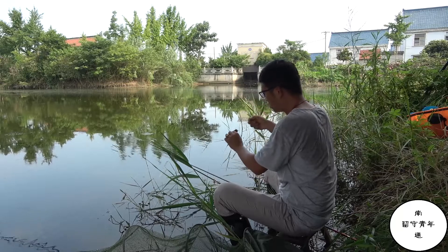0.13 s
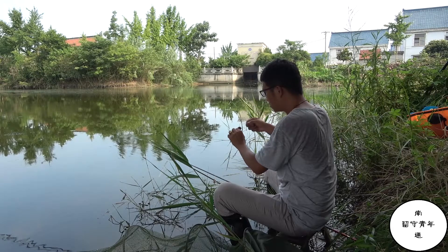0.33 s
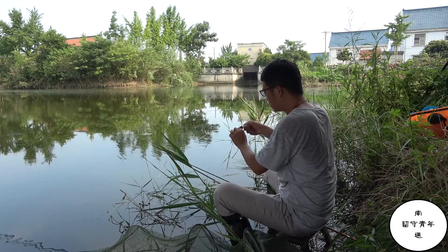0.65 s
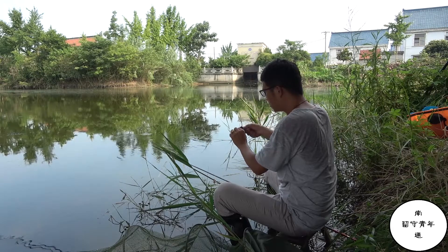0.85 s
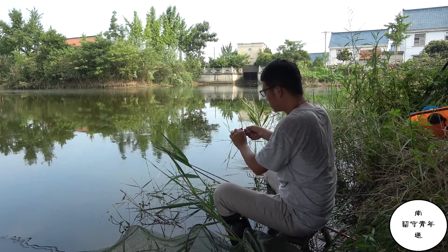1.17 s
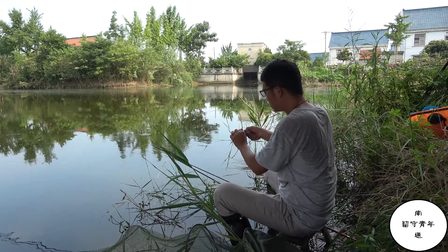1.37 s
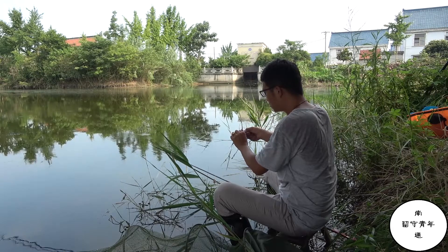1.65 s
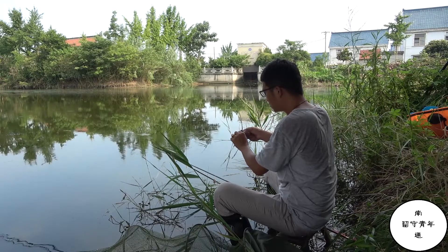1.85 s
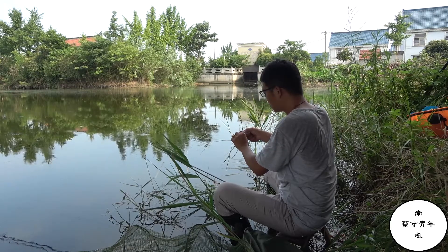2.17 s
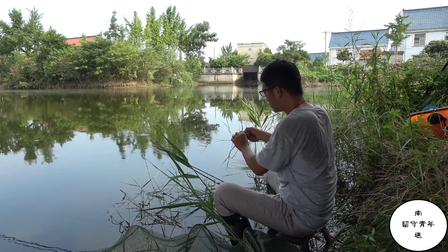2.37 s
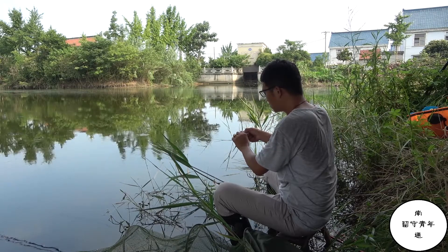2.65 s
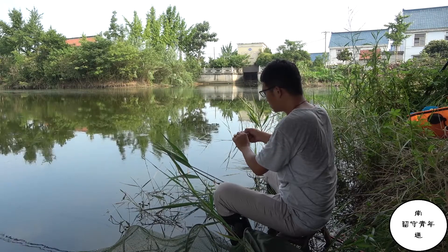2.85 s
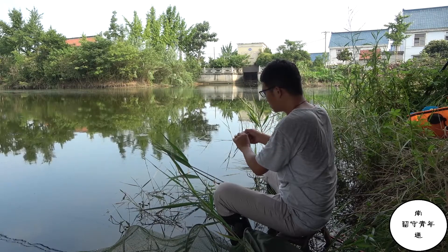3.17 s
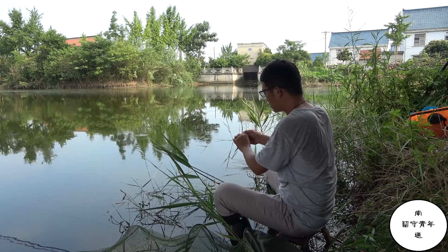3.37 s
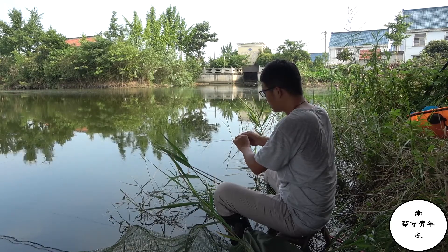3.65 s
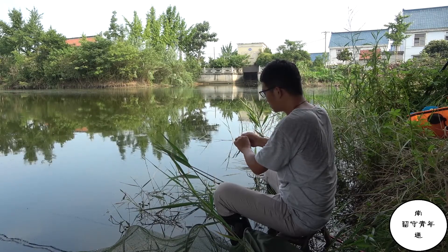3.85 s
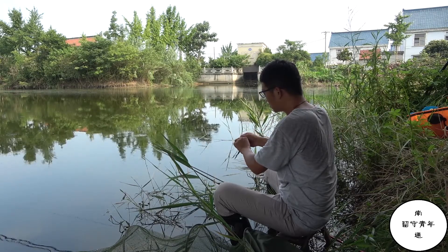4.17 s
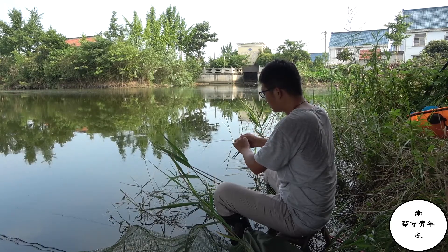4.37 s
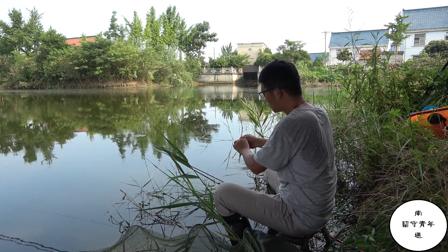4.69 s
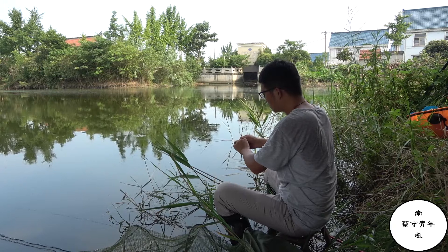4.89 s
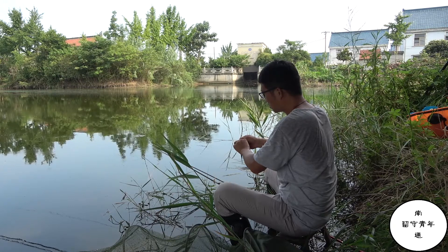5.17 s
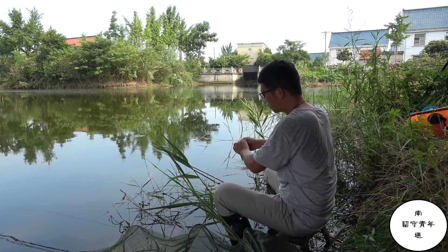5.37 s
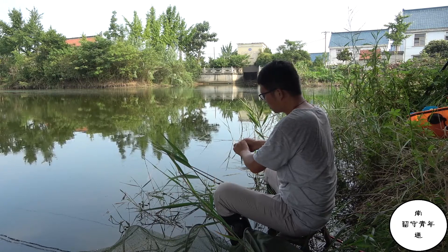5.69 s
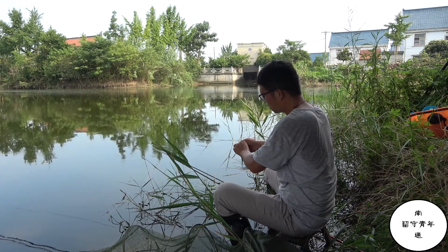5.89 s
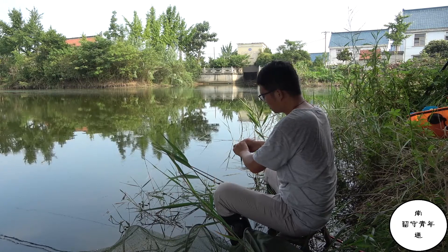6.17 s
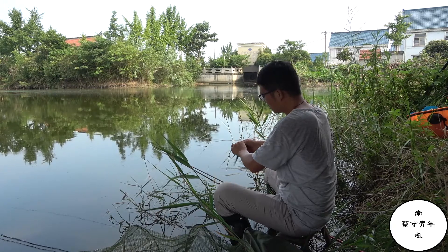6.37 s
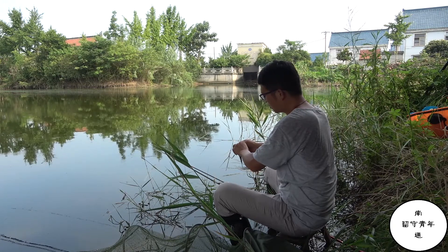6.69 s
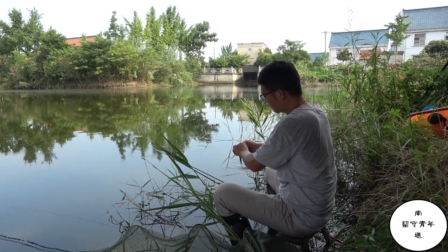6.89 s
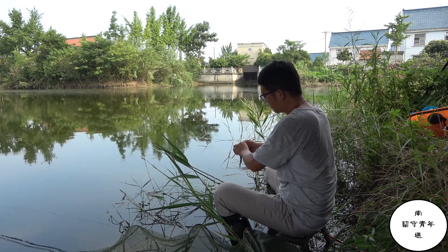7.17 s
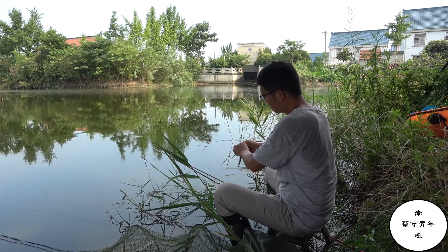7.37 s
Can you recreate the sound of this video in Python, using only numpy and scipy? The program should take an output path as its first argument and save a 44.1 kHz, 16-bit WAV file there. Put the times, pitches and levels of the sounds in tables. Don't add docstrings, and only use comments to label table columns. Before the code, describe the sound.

A dense, high, steady cicada chorus fills the air by a still pond, over faint distant machinery, with hoarse bird chips and a small water plop.

```python
import sys
import numpy as np
from scipy import signal
from scipy.fft import rfft, irfft, next_fast_len
from scipy.io import wavfile
from scipy.ndimage import uniform_filter1d

SR = 44100
rng = np.random.default_rng(int(sys.argv[2]) if len(sys.argv) > 2 else 0)


def waveform_to_disk(signal):
    frames = np.transpose(np.atleast_2d(signal))
    scaled = np.clip(frames, -1, 1) * 32767
    samples = np.round(scaled).astype(np.int16)
    wavfile.write(sys.argv[1], SR, samples)


def elevation(decibels):
    levels = np.asarray(decibels, float)
    return 10 ** (levels / 20)


N = 332469
SIZE = next_fast_len(N + 4096)
HZ = np.fft.rfftfreq(SIZE, 1 / SR)
TIME = np.arange(N) / SR


def evened(x):
    return x / np.sqrt(np.mean(x ** 2, -1, keepdims=True) + 1e-20)


def curves(rows):
    s, *columns = np.transpose(rows)
    return np.array([np.interp(TIME, s, c) for c in columns])


def wander(rate_hz):
    hz, phase = np.geomspace(.1, rate_hz, 16)[:, None], rng.random((16, 1))
    coarse = TIME[::64]
    waves = np.sin(2 * np.pi * (hz * coarse + phase)) / np.sqrt(hz)
    return np.interp(TIME, coarse, evened(waves.sum(0)))


def sides(pan_db):
    return elevation(np.array([pan_db / 2, -pan_db / 2]))


def resonate(x, hz, width):
    turn = np.exp(2j * np.pi * np.cumsum(hz * np.ones(len(x))) / SR)
    r = np.exp(-np.pi * width / SR)
    return 2 * (turn * signal.lfilter([(1 - r) ** 2], [1, -2 * r, r * r], x / turn)).real


def add(mix, s, sound):
    part = mix[:, round(s * SR):][:, :sound.shape[1]]
    part += sound[:, :part.shape[1]]


def cicadas(modes, effort, pan_db, rate_hz, jitter, shared, echo_s, throb_db, spread, count):
    grid = HZ[::64]
    power = sum(elevation(db) ** 2 / (1 + (2 * (grid - hz) / width) ** 2) ** 2 for hz, width, db in modes)
    body = np.sqrt(power)
    body /= np.sqrt(1 + (3150 / (grid + 1)) ** 24)
    t = np.arange(4096) / SR
    decay = np.exp(-np.log(1000) * t / echo_s) * (1 - np.exp(-t / 0.0098))
    chorus = 0
    for _ in range(count):
        uneven = jitter * evened(uniform_filter1d(rng.standard_normal(N), 60))
        pace = rate_hz * rng.uniform(.9, 1.1) * (1 + .02 * wander(3) + uneven)
        clicks = np.diff(np.floor(np.cumsum(pace) / SR), prepend=0)
        clicks *= elevation(3.3 * rng.standard_normal(N) + throb_db * wander(14))
        both, *each = rng.standard_normal((3, len(t))) * decay
        leaves = rfft(shared * both + np.array(each), SIZE)
        tuned = np.interp(HZ * (1 + spread * rng.uniform(-0.9, 1)), grid, body)
        chorus = chorus + rfft(clicks, SIZE) * tuned * leaves
    song = irfft(chorus, SIZE)
    song = song[:, :N] + np.pad(song[:, N:], ((0, 0), (0, 2 * N - SIZE)))
    drift_db = np.linspace(*pan_db, N)
    return elevation(curves(effort)) * sides(drift_db) * evened(song)


# (frequency [Hz], width [Hz], level [dB])
HIGH_MODES = [(7103, 520, -4), (7610, 590, 1), (8160, 740, 0.5), (8750, 610, -4), (9290, 880, -10.5),
              (9860, 1870, -21), (11500, 4400, -30.5)]
# (time [s], level [dB])
HIGH_EFFORT = [(0, -32.5), (7.6, -32.5)]


def high_chorus():
    return cicadas(HIGH_MODES, HIGH_EFFORT, (4.8, 4.7), rate_hz=460, jitter=.12, shared=0.08,
                   echo_s=.1, throb_db=.5, spread=.007, count=7)


# (frequency [Hz], width [Hz], level [dB])
MIDDLE_MODES = [(5546, 430, -3.5), (5986, 440, 1), (6430, 760, -1)]
# (time [s], level [dB])
MIDDLE_EFFORT = [(0, -43), (4, -41.5), (7.6, -43.5)]


def middle_chorus():
    return cicadas(MIDDLE_MODES, MIDDLE_EFFORT, (2.5, 4.5), rate_hz=400, jitter=.2, shared=0.89,
                   echo_s=0.093, throb_db=2.5, spread=0.0091, count=4)


# (frequency [Hz], width [Hz], level [dB])
SWELLING_MODES = [(3400, 75, -1.5), (4030, 2300, -0.5), (4680, 440, 3.5), (5570, 1300, 0),
                  (6440, 1800, -4.5), (10340, 1060, -12)]
# (time [s], level [dB])
SWELLING_EFFORT = [(0, -50), (1.6, -56), (2.2, -48), (4, -44.5), (4.8, -42), (5.8, -42.5), (7.6, -44.5)]


def swelling_chorus():
    return cicadas(SWELLING_MODES, SWELLING_EFFORT, (12, 22), rate_hz=350, jitter=.25, shared=1.37,
                   echo_s=0.12, throb_db=-1.0, spread=0.015, count=5)


# (frequency [Hz], width [Hz], level [dB])
FADING_MODES = [(3550, 400, -2.5), (4370, 200, 1), (4720, 930, -2.5)]
# (time [s], level [dB])
FADING_EFFORT = [(0, -45.5), (2, -46.5), (5, -54), (7.6, -63)]


def fading_chorus():
    return cicadas(FADING_MODES, FADING_EFFORT, (1.5, 14), rate_hz=300, jitter=.25, shared=2.7,
                   echo_s=0.049, throb_db=0.95, spread=0.017, count=4)


# (frequency [Hz], density [dB per Hz])
AIR = [(12, -37), (20, -5), (64, 4), (167, 1), (300, -3), (550, -10), (900, -7.5), (1230, -15), (1800, -19),
       (2300, -15.5), (2900, -21), (3800, -23.5)]
# (frequency [Hz], correlation [share])
AIR_SAME = [(40, .9995), (90, .998), (160, .985), (300, .88), (500, .83), (1200, .88), (2500, .88)]


def air():
    air_db, hiss_db = -53, -72
    a, b = rfft(rng.standard_normal((2, SIZE)))
    same = np.clip(np.interp(HZ, *np.transpose(AIR_SAME)), -1, 1)
    hz, db = np.transpose(AIR)
    colour = elevation(np.interp(np.log(HZ + 1), np.log(hz), db))
    pair = np.array([a, same * a + np.sqrt(1 - same ** 2) * b]) * colour
    rumble = evened(irfft(pair, SIZE)[:, :N])
    hiss = signal.lfilter([1], [1, -.5], rng.standard_normal((2, N)))
    return elevation(air_db + 0.38 * wander(9.4)) * rumble + elevation(hiss_db) * hiss


def drone():
    near, far = (evened(resonate(rng.standard_normal(N), 783, 292)) for _ in range(2))
    throb = evened(uniform_filter1d(uniform_filter1d(rng.standard_normal(N), 900), 900))
    pair = near + .3 * far * np.array([[1], [-1]])
    return elevation(-57.5 + 1.3 * throb) * sides(3.5)[:, None] * pair


def whine():
    start_hz, sag_hz, pass_s, sag_s = 837, 81.4, 1.01, 0.27
    near_db, far_db, near_s, stay_s = -52, -12.5, 0.99, 0.65
    hz = start_hz - sag_hz * (.5 + .5 * np.tanh((TIME - pass_s) / sag_s)) + 14 * wander(5)
    level_db = near_db + far_db * (1 - np.exp(-.5 * ((TIME - near_s) / stay_s) ** 2))
    strands = 0
    for ratio, db in ((1, -4), (0.845, -6.0)):
        strand = evened(resonate(rng.standard_normal(N), ratio * hz, 31.6))
        strands = strands + elevation(level_db + db + 3.7 * wander(10)) * strand
    return strands


# (peak time [s], half length [s], level [dB], centre [Hz])
SWELLS = [
    (.5, 0.97, -58.5, 162),
    (2.2, 0.24, -58, 265),
    (3.3, 0.52, -55, 243),
    (5.2, 0.56, -53, 186),
    (6.9, 0.75, -58.5, 175),
    (4.95, 0.28, -61, 430),
]


def swells():
    total = np.zeros((2, N))
    for s, half, db, centre_hz in SWELLS:
        low, side = (evened(resonate(noise, centre_hz, 127)) for noise in rng.standard_normal((2, N)))
        bell = np.exp(-.5 * ((TIME - s) / half) ** 2)
        total += elevation(db) * bell * (low + 0.027 * side * np.array([[1], [-1]]))
    return total


# (frequency [Hz], rms level [dB])
HUM = [(300, -66.5), (410, -72), (1350, -79)]


def hum():
    total = 0
    for hz, db in HUM:
        tone = np.sin(2 * np.pi * hz * TIME + 1.47 * wander(6))
        total = total + np.sqrt(2) * elevation(db + 0.52 * wander(4.7)) * tone
    return total


# (time [s], length [s], level [dB], centre [Hz], width [Hz])
RUSTLES = [(0.82, 0.083, -57.5, 2100, 1100), (0.863, 0.11, -56, 1890, 600), (0.926, 0.12, -59, 2000, 1200),
           (1.019, 0.086, -58, 2200, 1500), (2.263, 0.076, -55.5, 1390, 1900),
           (4.018, 0.27, -60.5, 2660, 800), (4.155, 0.082, -60, 1380, 500), (4.517, 0.083, -56, 2420, 1500),
           (5.66, 0.14, -61.5, 1510, 1200), (5.998, .1, -65, 1700, 900), (6.705, 0.066, -63, 1900, 1300),
           (6.913, 0.14, -59.5, 1980, 1800), (7.395, 0.15, -57, 2010, 1600)]


def reeds(mix):
    for s, length, db, hz, width in RUSTLES:
        u = np.linspace(0, 1, round(np.clip(length * 1.04, .01, .5) * SR))
        clumps, noise = rng.standard_normal((2, 22050))
        clumps = elevation(2.5 * evened(uniform_filter1d(clumps, 150)))
        scratch = evened(resonate((clumps * noise)[:len(u)], hz, width))
        stroke = np.sin(np.pi * u ** 0.54) ** 0.88
        add(mix, s, elevation(db + 1.5) * scratch * stroke * np.ones((2, 1)))


# (time [s], peak level [dB], pitch [Hz], fall of pitch [share])
CHIPS = [(2.908, -55, 1910, 0.11), (2.982, -47, 2340, 0.15), (3.05, -61, 2250, .03),
         (3.185, -55, 2300, .05), (3.237, -45, 2510, 0.019), (3.25, -50, 2680, 0.052),
         (3.592, -41.5, 2420, 0.15), (3.798, -51, 2370, 0.15), (3.999, -40, 2356, 0.078),
         (4.044, -54, 2380, .02), (4.199, -50, 2370, 0.09), (4.357, -46.5, 2450, 0.027),
         (4.37, -53, 2140, 0.13), (4.787, -39.5, 2280, 0.014), (4.967, -59, 2300, 0.046),
         (5.226, -45, 2300, 0.059), (5.232, -55, 2080, .04), (5.43, -59, 2290, .03),
         (5.663, -43.5, 2150, 0.024), (5.865, -58, 2200, .05), (6.127, -46, 2360, .14),
         (6.536, -49, 2350, 0.14), (6.73, -44.5, 2610, .01), (6.928, -54, 2320, 0.092),
         (7.08, -50, 2610, .05)]


def bird(mix):
    u = np.linspace(0, 1, round(.039 * SR))
    for s, db, hz, fall in CHIPS:
        flutter, rasp = evened(uniform_filter1d(rng.standard_normal((2, 8820)), 90))[:, :len(u)]
        turns = np.cumsum(hz * (1 + fall * (.25 - u ** 1.6) + .015 * flutter)) / SR
        voice = np.sin(2 * np.pi * turns) + elevation(-11.5) * np.sin(np.pi * turns)
        note = voice * (1 + 0.33 * rasp) * np.sin(np.pi * u ** 0.85)
        tail = rng.standard_normal((2, 4000)) * elevation(-32.5 - np.arange(4000) / SR * 410)
        tail[:, 0] = 1
        heard = signal.fftconvolve(note[None], tail, axes=1)
        add(mix, s - .006, elevation(db - 4) * sides(1.5)[:, None] * heard)


# (time [s], level [dB], first pitch [Hz], length [s])
PLOPS = [
    (3.859, -38, 610, .02),
    (5.89, -50, 600, .03),
]


def bubbles(mix):
    for s, db, hz, length in PLOPS:
        u = np.linspace(0, 1, round(length * SR))
        turns = np.cumsum(hz * (1 + .9 * u)) / SR
        pulse = np.sin(2 * np.pi * turns) * np.sin(np.pi * u ** .8) ** 2
        add(mix, s, elevation(db) * pulse * sides(5.)[:, None])


def scene():
    mix = high_chorus() + middle_chorus() + swelling_chorus() + fading_chorus()
    mix += air() + drone() + whine() + swells() + hum()
    reeds(mix)
    bird(mix)
    bubbles(mix)
    return mix


def top_cut(x):
    return signal.sosfilt(signal.butter(12, 15700, fs=SR, output="sos"), x)


def record(dry):
    return top_cut(dry)


dry = scene()
out = record(dry)
waveform_to_disk(out)
```